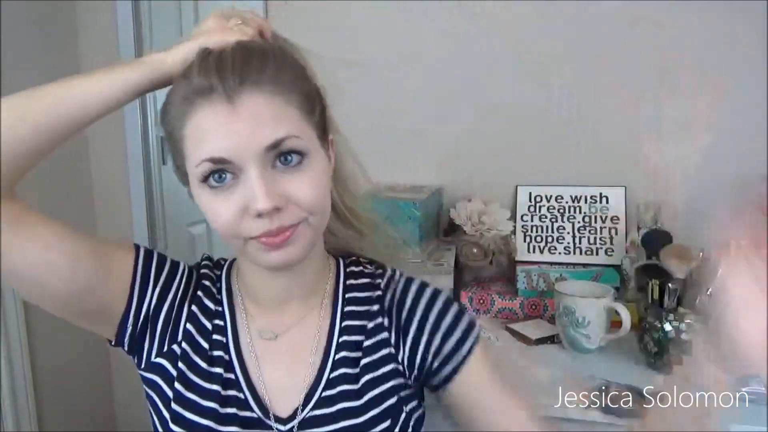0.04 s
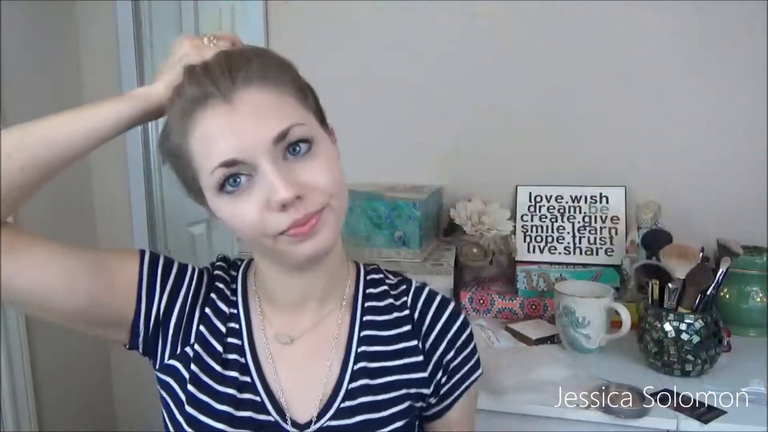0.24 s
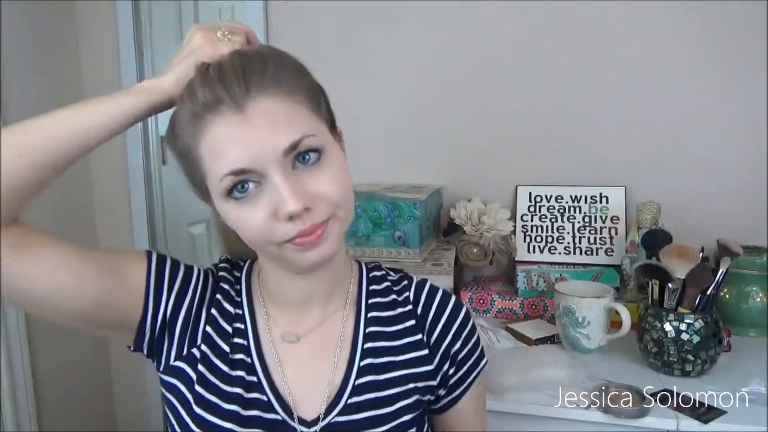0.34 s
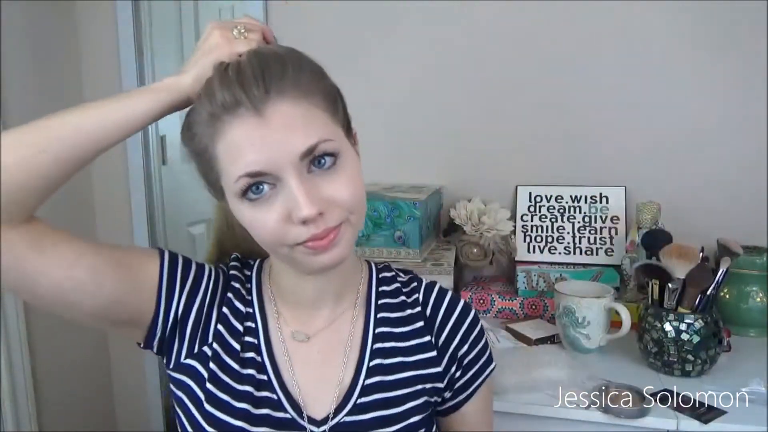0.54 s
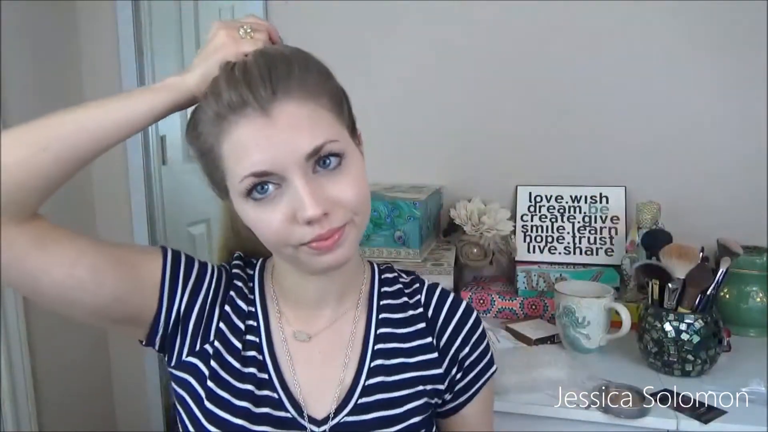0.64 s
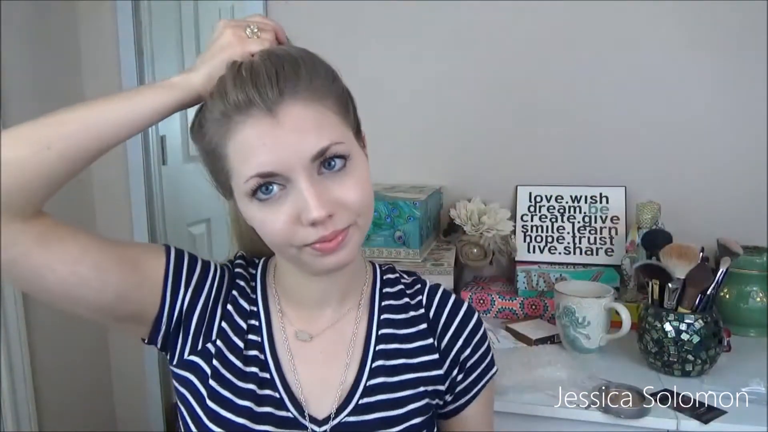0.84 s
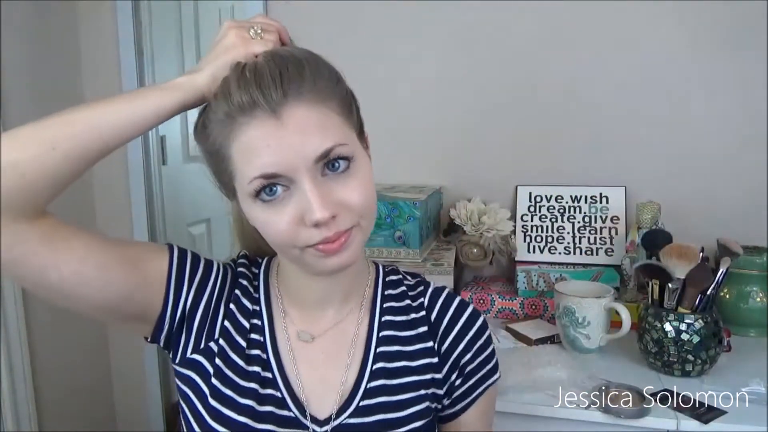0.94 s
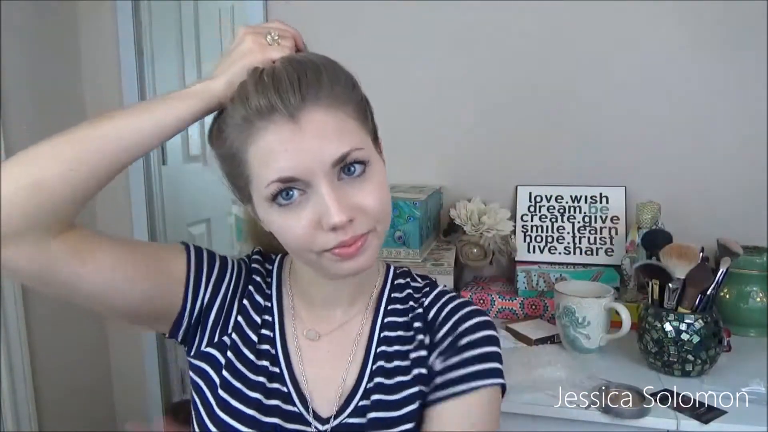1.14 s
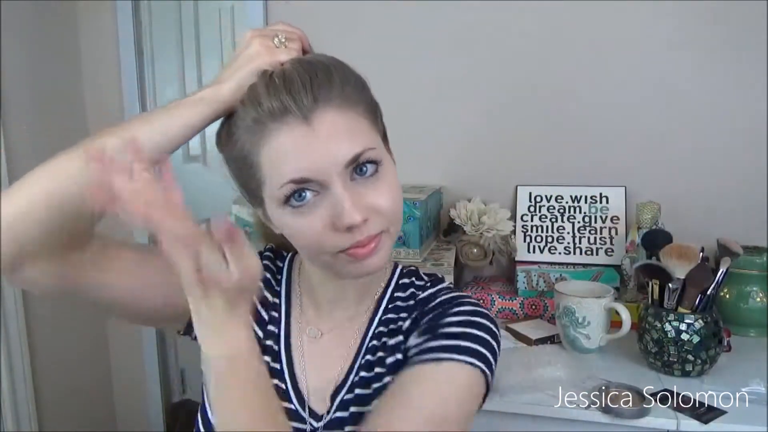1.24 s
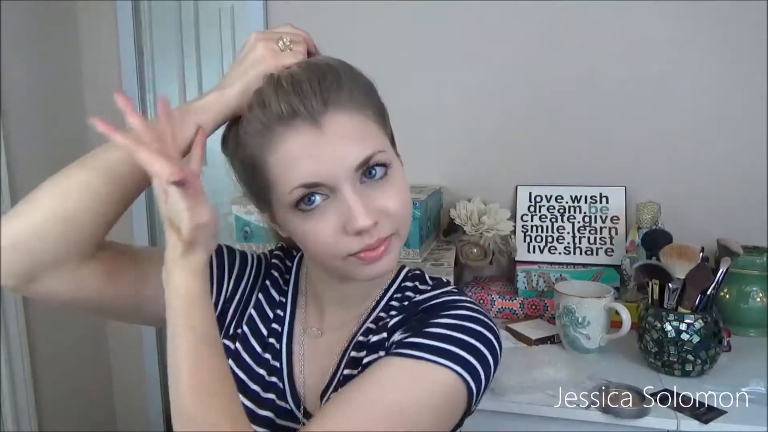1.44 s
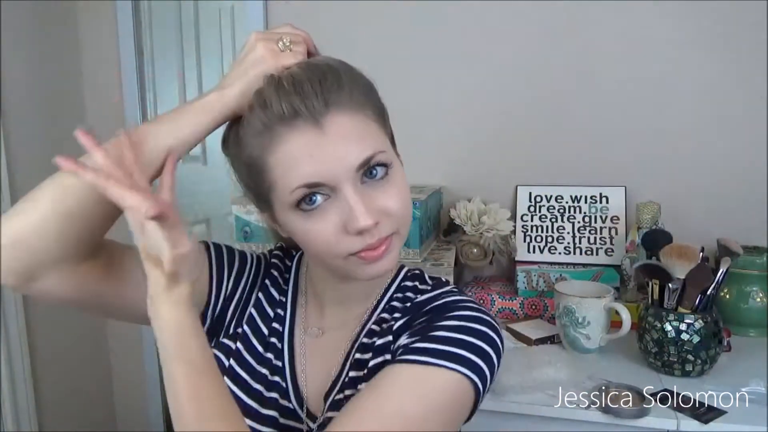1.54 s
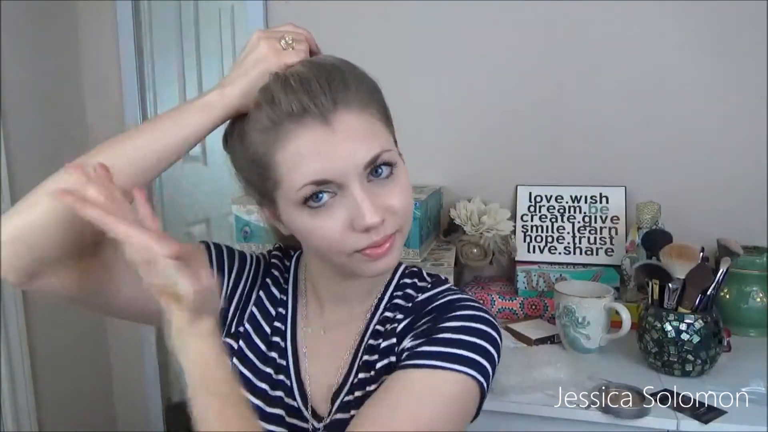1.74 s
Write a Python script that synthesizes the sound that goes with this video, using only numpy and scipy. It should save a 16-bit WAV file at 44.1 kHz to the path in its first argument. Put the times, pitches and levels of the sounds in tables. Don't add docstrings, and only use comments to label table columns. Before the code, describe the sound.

A sharp elastic snap on a wrist comes early, with a short room echo; faint grainy hair strokes follow, over quiet rapid lens-motor ticking, low hum and hiss, picked up by a nearby camera microphone.

```python
import sys
import numpy as np
from scipy import signal
from scipy.fft import rfft, irfft
from scipy.io import wavfile
from scipy.ndimage import uniform_filter1d

SR = 44100
rng = np.random.default_rng(int(sys.argv[2]) if len(sys.argv) > 2 else 0)


def pcm_store(signal):
    levels = np.round(np.clip(np.atleast_2d(signal), -1, 1) * 32767)
    wavfile.write(sys.argv[1], SR, levels.astype(np.int16).T)


def field_ratio(decibels):
    return 10 ** (np.asarray(decibels, dtype=float) / 20)


N = 79380
T = np.arange(N) / SR

# (peak time [s], level [dB], ring [Hz], rise [s], t60 [s])
SNAP_RINGS = [(.2087, -23, 360, .0012, .009), (.20888, -25, 1480, .0016, .012),
              (.20995, -19.5, 3100, .0002, .0018), (.20925, -26, 4300, .0002, .002),
              (.2083, -26, 2600, .0002, .002), (.2010, -35, 7000, .0001, .002),
              (.2096, -30, 5200, .0002, .002), (.2098, -29, 9000, .0003, .002),
              (.2131, -29, 1200, .0005, .006), (.2192, -32, 2500, .0003, .003),
              (.2310, -32, 700, .001, .01), (.2120, -35, 640, .001, .03), (.2130, -36, 430, .002, .03),
              (.2105, -37, 220, .002, .04), (.2084, -33, 9000, .0004, .003)]
# (time [s], level [dB], rise [s], t60 [s])
SCRAPE_BURSTS = [
    (.2007, -40, .0003, .04),
    (.2066, -33, .0025, .012),
    (.2135, -35, .0005, .03),
]
# (frequency [Hz], density [dB per Hz])
SCRAPE_SPECTRUM = [(150, -33), (400, -35), (1000, -1), (2400, -6.5), (4500, -1.5), (6500, -6), (9200, 3.5),
                   (11200, -12)]
# (frequency [Hz], likeness [0-1])
SCRAPE_LIKENESS = [(300, .98), (1500, 0.69), (4500, 1), (10000, 0.84)]
# (frequency [Hz], t60 [s])
ROOM_T60 = [(120, 0.096), (320, 0.3), (840, 0.26), (2210, 0.16), (5820, 0.16)]
# (frequency [Hz], level [dB])
ROOM_SPECTRUM = [(70, -37), (140, -10.5), (220, 5), (550, -7.3), (1100, -4), (3500, -5.5), (6500, -16),
                 (10000, -14.5)]
# (frequency [Hz], likeness [0-1])
ROOM_LIKENESS = [(100, 1), (400, 0.87), (1000, 0.72), (3000, 0.68), (10000, 0.38)]
# (start [s], rise [s], hold [s], level [dB], dull share [0-1])
HAIR_STROKES = [
    (-.1, 0.056, 0.21, -66, 0.08),
    (0.239, 0.013, 0.039, -57, 0.35),
    (0.314, 0.01, 0.041, -63, 0.1),
    (0.407, .02, 0.059, -68, 0.18),
    (0.907, 0.056, 0.022, -54.5, 0.05),
    (1.042, 0.099, .07, -63, 0.41),
    (1.228, 0.017, 0.096, -70.5, 0.14),
]
# (frequency [Hz], density [dB per Hz])
BRIGHT_SPECTRUM = [(1470, -38), (2500, -11.5), (3290, -12.5), (4210, -9), (5980, -6), (6490, -9), (9510, 0),
                   (11200, -6), (14600, -45), (22000, -120)]
# (frequency [Hz], density [dB per Hz])
DULL_SPECTRUM = [(700, -5), (1500, 2), (2300, 4.5), (4000, 0.5), (6000, -24), (9000, -5), (11200, -19)]
# (from time [s], ring [Hz], level [dB], second ring [Hz], its level [dB])
LENS_PITCHES = [(0., 2690, -58, 3350, -71), (.15, 2730, -60.5, 3230, -70), (.27, 3320, -64, 2680, -63.5),
                (.45, 2460, -60, 3270, -69), (.48, 3320, -63.5, 2650, -69), (.95, 2450, -61.5, 3330, -69),
                (1.14, 2500, -65, 3300, -73), (1.25, 2657, -58.5, 3450, -70), (1.65, 2720, -64, 3310, -70),
                (1.68, 3590, -64.5, 2640, -70), (1.72, 2720, -59.5, 3400, -76)]
# (frequency [Hz], width [Hz], level [dB])
HUM_LINES = [(48.2, 20, -79.5), (102.7, 21, -75.5), (148.2, 23, -76.5), (236, 20, -79)]
# (frequency [Hz], density [dB per Hz])
HISS_SPECTRUM = [(30, -10.5), (60, -10.5), (250, -10), (450, -10.5), (720, -13), (1000, -11), (1800, -16.5),
                 (11200, -26)]
# (frequency [Hz], likeness [0-1])
HISS_LIKENESS = [(60, 0.91), (140, 0.78), (340, 0.37), (820, 0.098), (1960, 0.13), (4690, 0.45),
                 (11200, 0.9)]

SNAP_LOW_HZ, SNAP_PAN_DB = 102, 1.2
ROOM_CRACK_S, ROOM_DB, ROOM_GAP_S, ROOM_GRAIN_DB = 0.209, -5, 0.0012, 1.5
STROKE_GRAIN_DB, STROKE_LUMP_DB, STROKE_LIKENESS = 1.5, 1, 0.83
STROKE_PAN_DB, STROKE_FALL_S = 1, 0.042
FRAME_S = 1001 / 30000
STEP_AT_S, STEP_RISE_S, STEP_HOLD_S, STEP_T60_S = 0.029, 0.0013, 0.0019, 0.038
STEP_DETUNE, STEP_SPREAD_DB = 0.009, 1.2
TICK_HZ, TICK_DB, TICK_T60_S, TICK_RISE_S = 3640, -67.5, 0.0089, 0.0006
HISS_DB, DRONE_HZ, DRONE_DB = -63, 104.2, -70
EDGE_HZ = 11070


def evened(x):
    return x / np.sqrt(np.mean(x ** 2) + 1e-20)


def read(points, hz):
    f, value = np.transpose(points)
    return np.interp(np.log(hz + 1), np.log(f + 1), value)


def colour(x, table):
    hz = np.fft.rfftfreq(x.shape[-1], 1 / SR)
    low_fall = np.minimum(hz / table[0][0], 1) ** 2
    return irfft(rfft(x) * field_ratio(read(table, hz)) * low_fall, x.shape[-1])


def noise_pair(likeness):
    a, b = rfft(rng.standard_normal((2, N)))
    c = np.clip(read(likeness, np.fft.rfftfreq(N, 1 / SR)), 0, 1)
    return irfft(np.array([a, c * a + np.sqrt(1 - c ** 2) * b]), N)


def lumps(count, size):
    return evened(uniform_filter1d(rng.standard_normal(count), size=size))


def panned(x, db):
    return x * field_ratio(db * np.array([[-.5], [.5]]))


def snap():
    rings = np.zeros(N)
    for peak_s, db, hz, rise_s, t60_s in SNAP_RINGS:
        t = T - peak_s
        swell = np.exp(-(np.minimum(t, 0) / rise_s) ** 2)
        decay = field_ratio(-60 * np.maximum(t, 0) / t60_s)
        sign = -1 if hz < 2700 else 1
        rings += sign * field_ratio(db) * swell * decay * np.cos(2 * np.pi * hz * t)
    shape = np.zeros(N)
    for start_s, db, rise_s, t60_s in SCRAPE_BURSTS:
        t = T - start_s
        shape += field_ratio(db - 60 * np.maximum(t, 0) / t60_s) * np.clip(t / rise_s, 0, 1)
    scrape = shape * evened(colour(noise_pair(SCRAPE_LIKENESS), SCRAPE_SPECTRUM))
    low_cut = signal.butter(2, SNAP_LOW_HZ, "high", fs=SR, output="sos")
    return signal.sosfiltfilt(low_cut, rings + scrape)


def room(x):
    length = SR // 2
    taps = field_ratio(ROOM_GRAIN_DB * lumps(length, 60)) * noise_pair(ROOM_LIKENESS)[:, :length]
    hz, t, z = signal.stft(taps, SR, nperseg=256)
    decay_db = -60 * t / read(ROOM_T60, hz)[:, None]
    tone_db = read(ROOM_SPECTRUM, hz)[:, None]
    tail = signal.istft(z * field_ratio(decay_db + tone_db), SR, nperseg=256)[1]
    tail = tail * np.clip(np.arange(tail.shape[1]) / SR / ROOM_GAP_S - 1, 0, 1)
    tail = tail / np.linalg.norm(tail, axis=1)[:, None]
    return signal.fftconvolve(x[None], tail, axes=1)[:, :N]


def hair_strokes():
    grain = field_ratio(STROKE_GRAIN_DB * lumps(N, 90) + STROKE_LUMP_DB * lumps(N, 700))
    likeness = [(100, STROKE_LIKENESS), (9000, STROKE_LIKENESS)]
    bright = evened(colour(grain * noise_pair(likeness), BRIGHT_SPECTRUM))
    dull = evened(colour(grain * noise_pair(likeness), DULL_SPECTRUM))
    out = np.zeros((2, N))
    for start_s, rise_s, hold_s, db, dull_share in HAIR_STROKES:
        t = T - start_s
        swell = t / rise_s
        fade = 1 - (t - rise_s - hold_s) / STROKE_FALL_S
        shape = np.sin(np.pi / 2 * np.clip(np.minimum(swell, fade), 0, 1)) ** 2
        out += field_ratio(db) * shape * (np.sqrt(1 - dull_share) * bright + np.sqrt(dull_share) * dull)
    return panned(out, STROKE_PAN_DB)


def ring(start_s, hz, t60_s, rise_s, hold_s):
    t = np.maximum(T - start_s, 0)
    decay = field_ratio(-60 * np.maximum(t - hold_s, 0) / t60_s)
    return np.minimum(t / rise_s, 1) * decay * np.sin(2 * np.pi * hz * t)


def lens_motor():
    step_shape = (STEP_T60_S, STEP_RISE_S, STEP_HOLD_S)
    out = np.zeros(N)
    for s in np.arange(STEP_AT_S - FRAME_S, N / SR, FRAME_S):
        a, b, c, d = rng.standard_normal(4)
        past = [row for row in LENS_PITCHES if row[0] <= max(s, LENS_PITCHES[0][0])]
        _, hz, db, hz2, db2 = past[-1]
        out += field_ratio(db + STEP_SPREAD_DB * a) * ring(s, hz * (1 + STEP_DETUNE * b), *step_shape)
        out += field_ratio(db2 + STEP_SPREAD_DB * c) * ring(s, hz2 * (1 + STEP_DETUNE * d), *step_shape)
        out += field_ratio(TICK_DB + 2 * STEP_SPREAD_DB * d) * ring(s, TICK_HZ, TICK_T60_S, TICK_RISE_S, 0)
    return out


def noise_floor():
    hz = np.fft.rfftfreq(N, 1 / SR)
    hum = np.zeros(N)
    for line_hz, width_hz, db in HUM_LINES:
        resonance = 1 / (1 + (2 * (hz - line_hz) / width_hz) ** 2)
        hum += field_ratio(db) * evened(irfft(rfft(rng.standard_normal(N)) * resonance, N))
    hiss = field_ratio(HISS_DB) * evened(colour(noise_pair(HISS_LIKENESS), HISS_SPECTRUM))
    drone = field_ratio(DRONE_DB) * np.sin(2 * np.pi * DRONE_HZ * T)
    return hiss + hum + drone


def scene():
    crack = np.zeros(N)
    crack[round(ROOM_CRACK_S * SR)] = 1
    hit = panned(snap() + field_ratio(ROOM_DB) * room(crack), SNAP_PAN_DB)
    return hit + hair_strokes() + lens_motor() + noise_floor()


def top_cut(x):
    return signal.sosfilt(signal.butter(12, 11810, fs=SR, output="sos"), x)


def record(dry):
    low_pass = signal.firwin(501, EDGE_HZ, window=("kaiser", 8), fs=SR)
    mix = signal.oaconvolve(dry, low_pass[None], "same")
    return top_cut(mix)


dry = scene()
out = record(dry)
pcm_store(out)
```